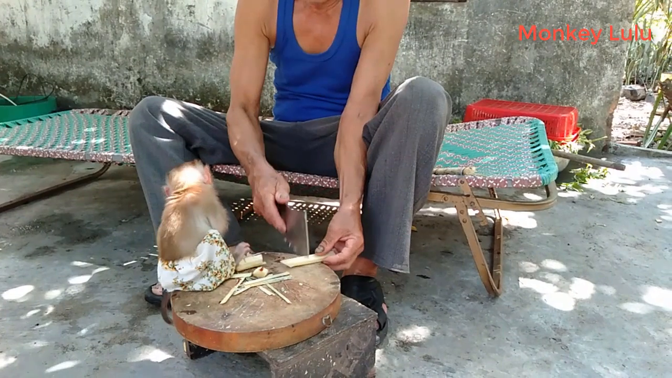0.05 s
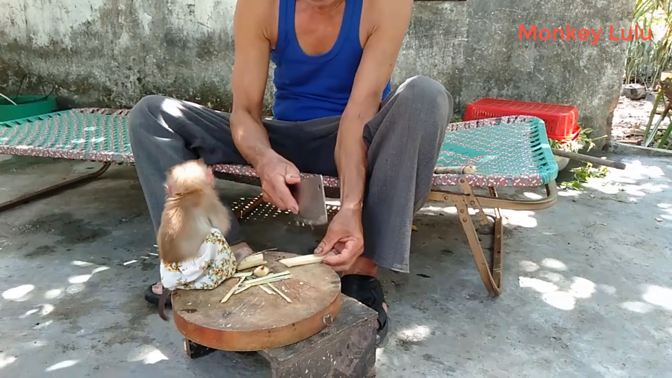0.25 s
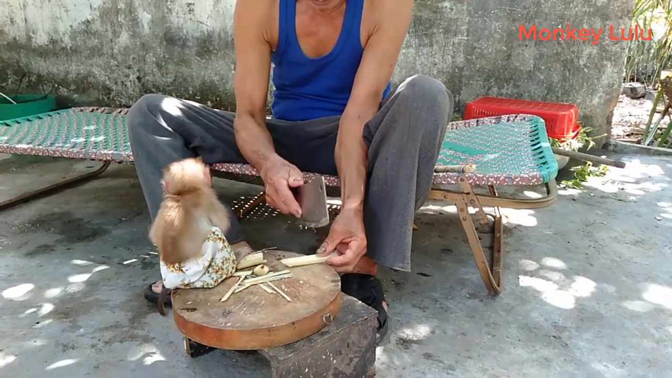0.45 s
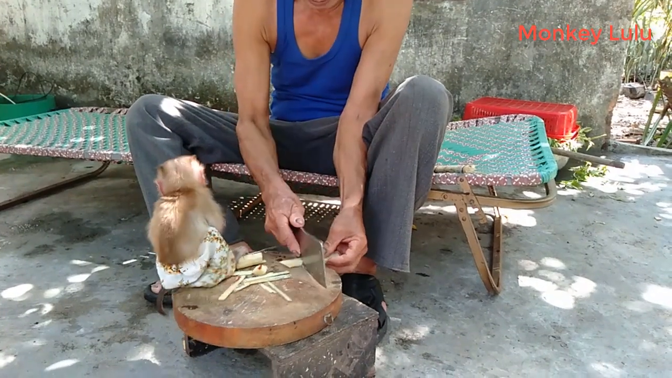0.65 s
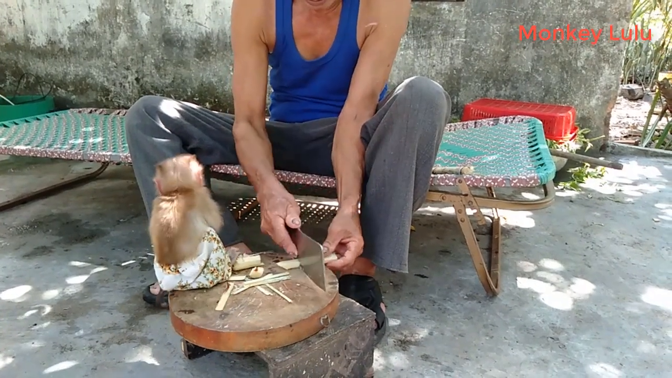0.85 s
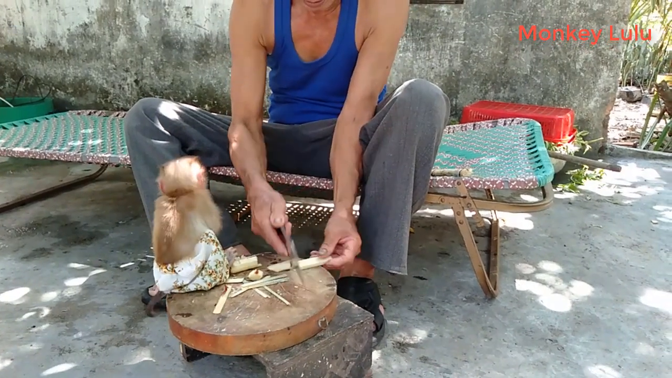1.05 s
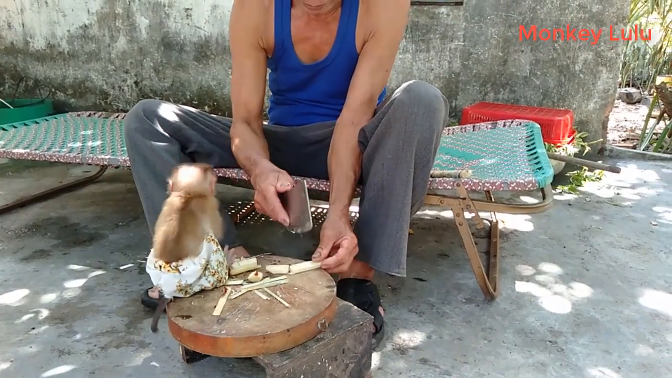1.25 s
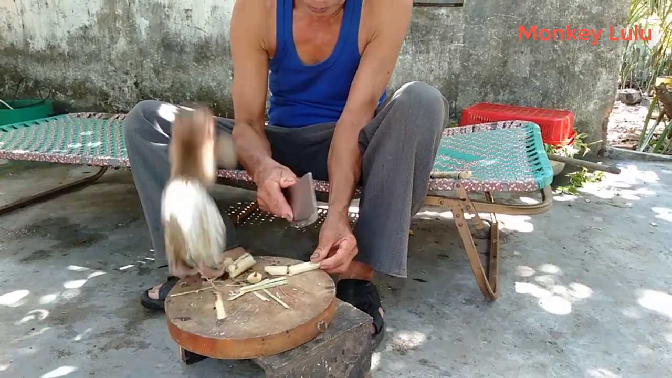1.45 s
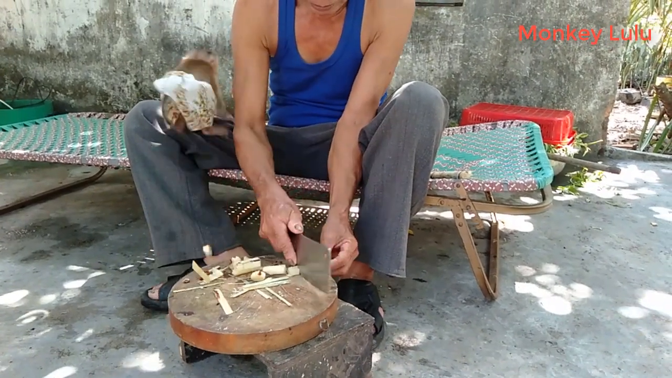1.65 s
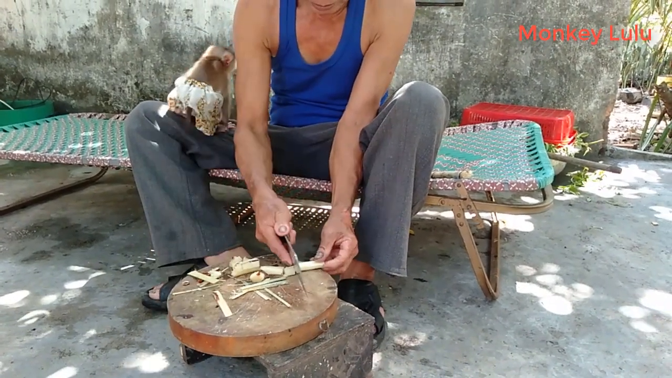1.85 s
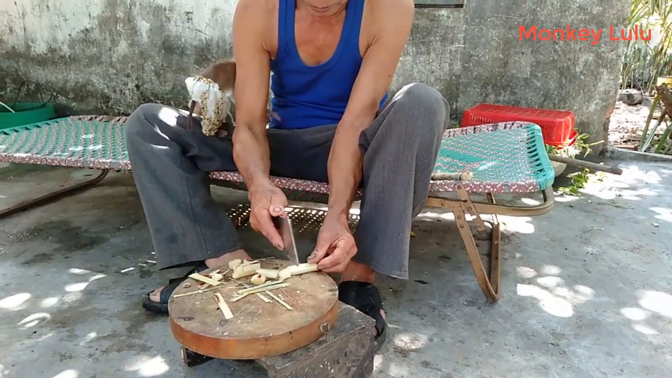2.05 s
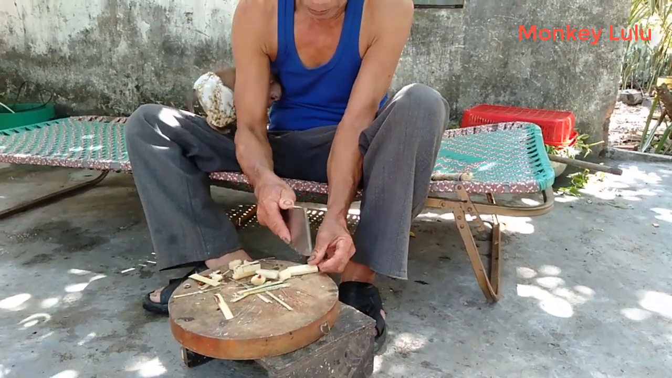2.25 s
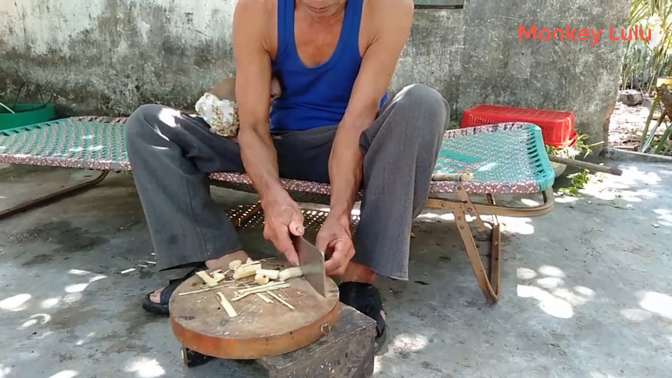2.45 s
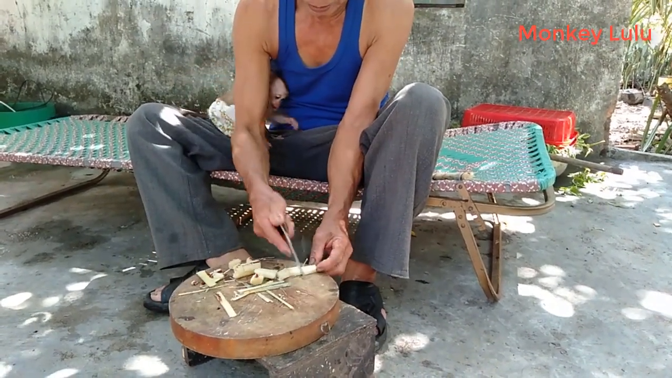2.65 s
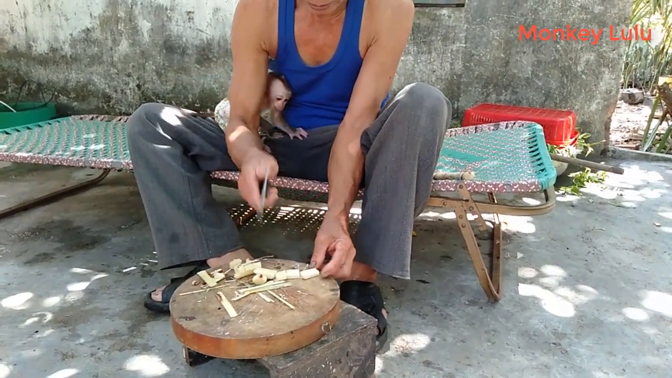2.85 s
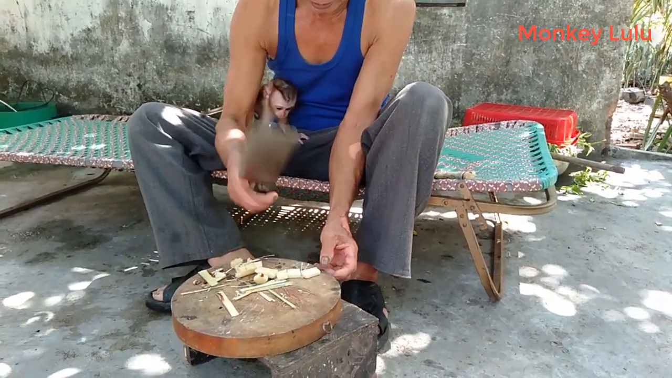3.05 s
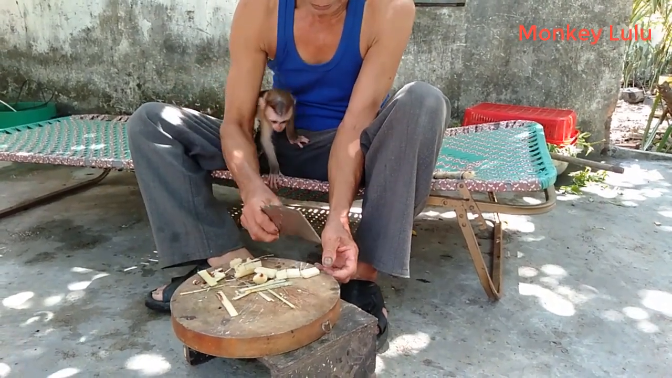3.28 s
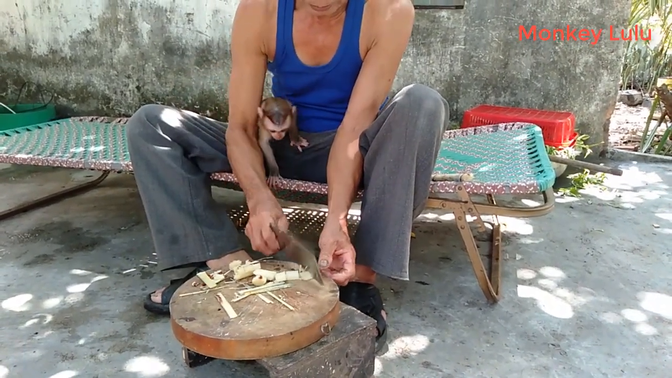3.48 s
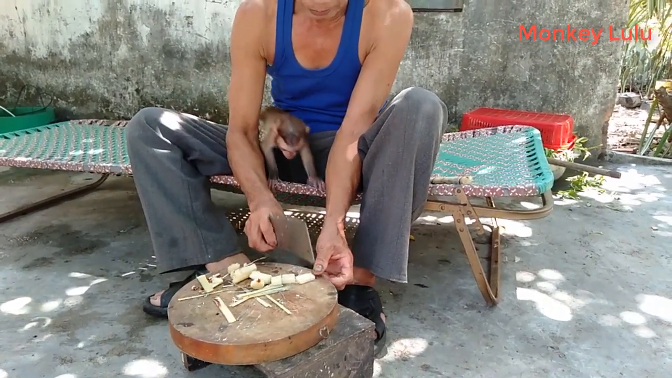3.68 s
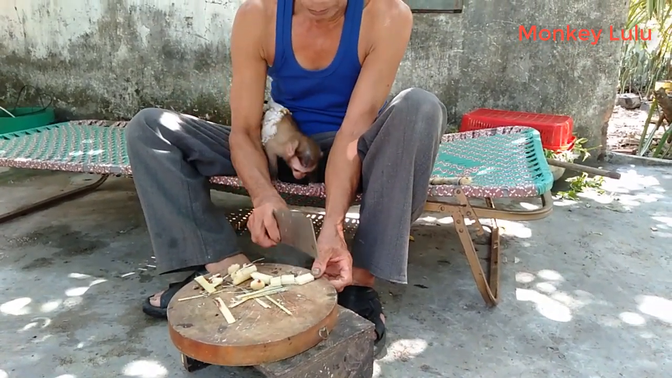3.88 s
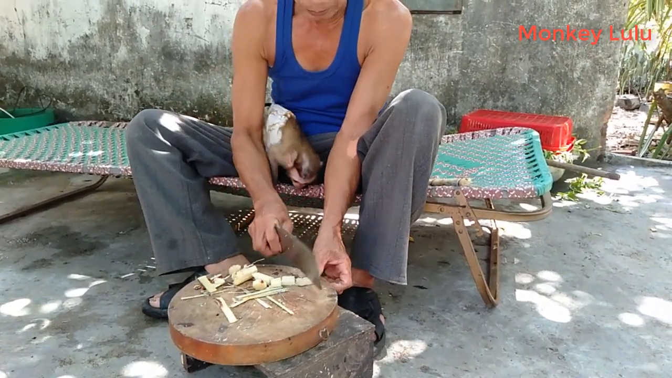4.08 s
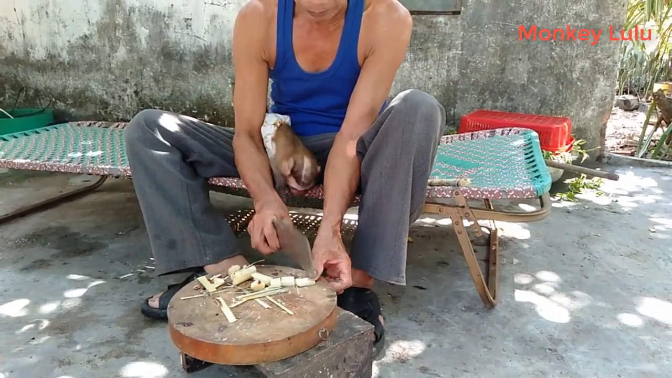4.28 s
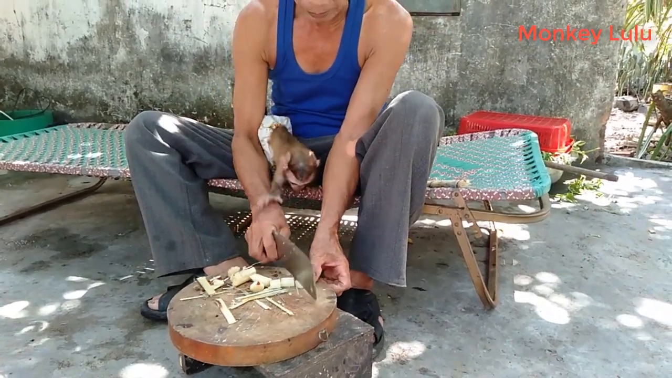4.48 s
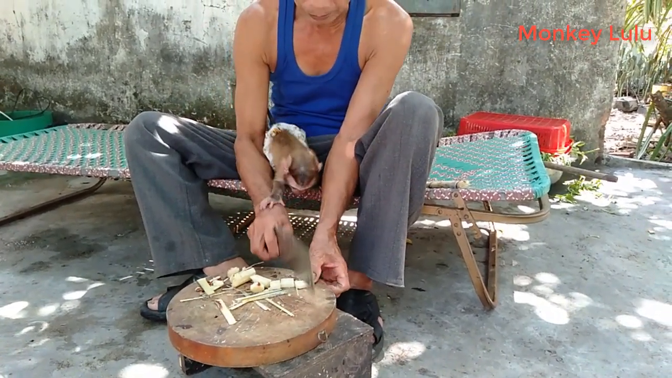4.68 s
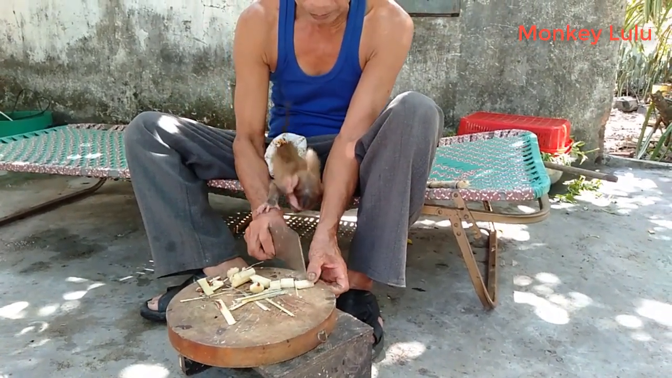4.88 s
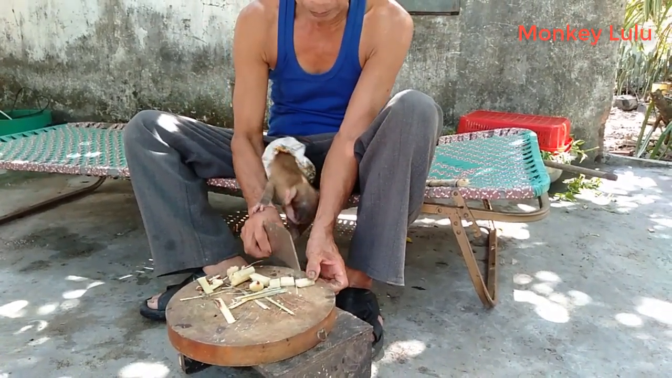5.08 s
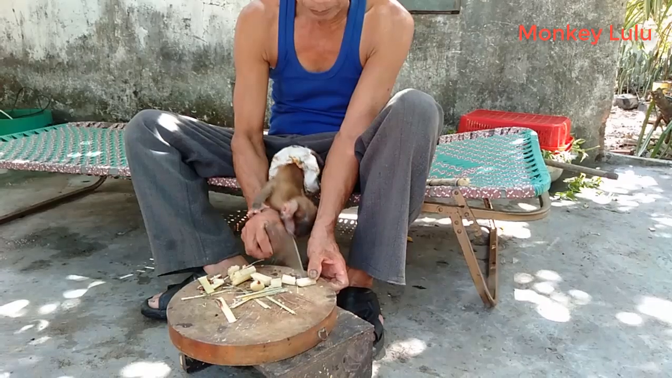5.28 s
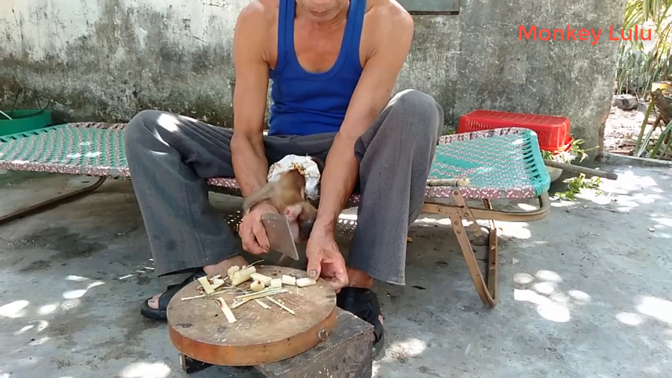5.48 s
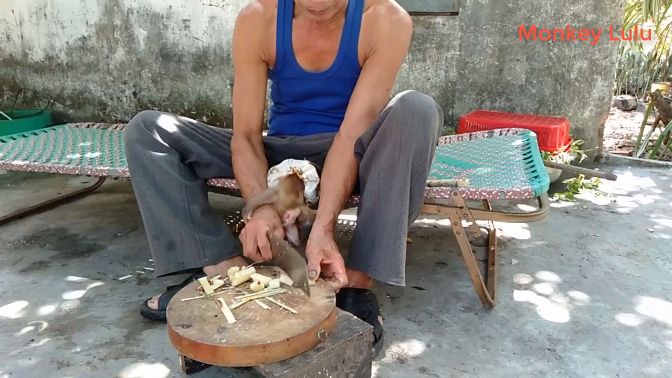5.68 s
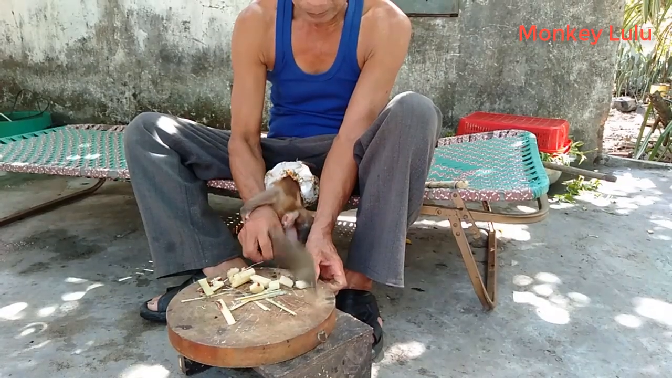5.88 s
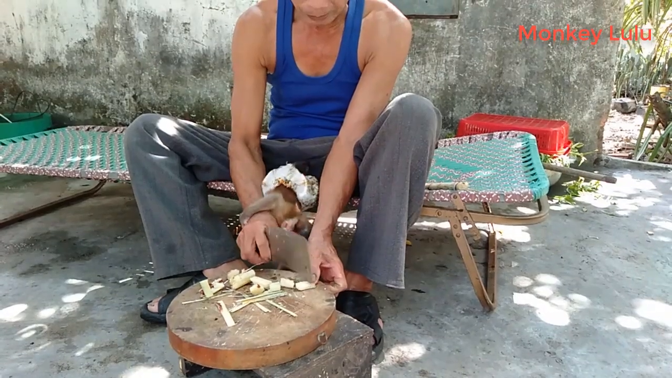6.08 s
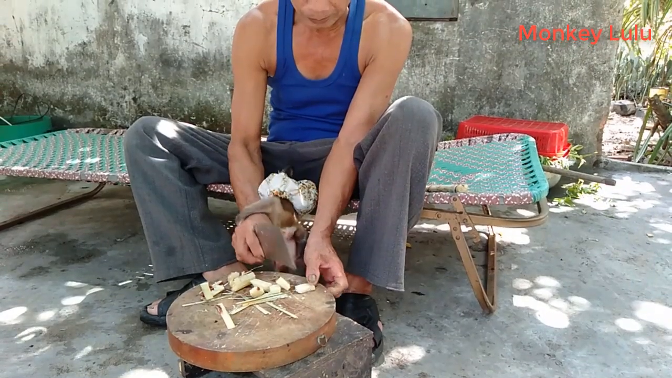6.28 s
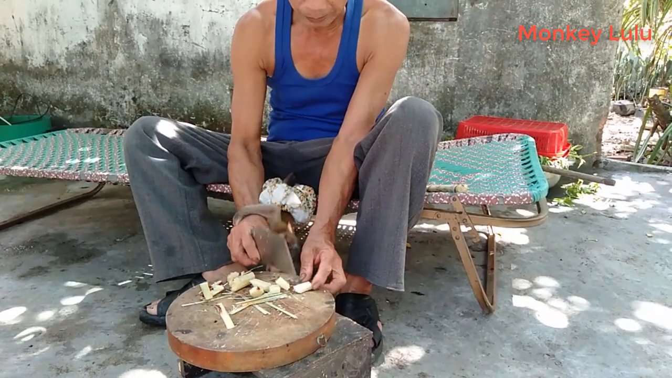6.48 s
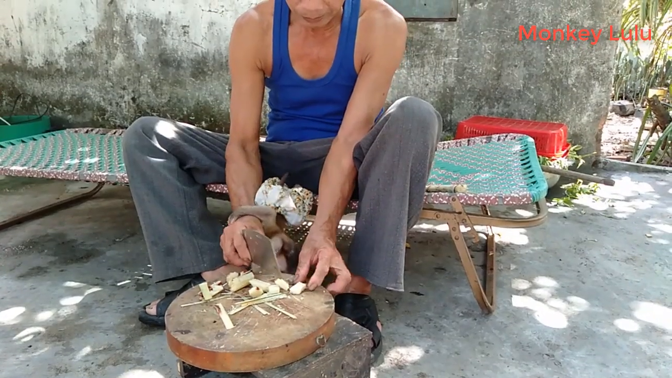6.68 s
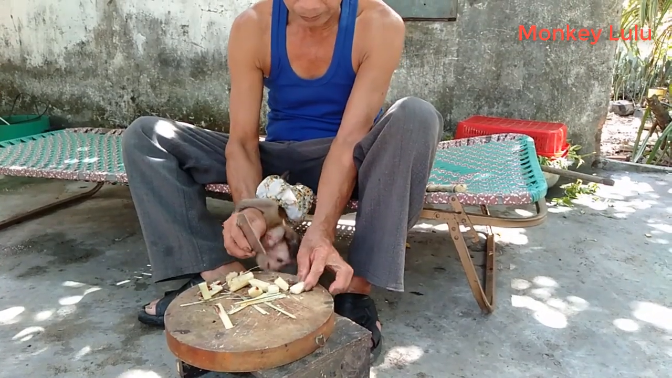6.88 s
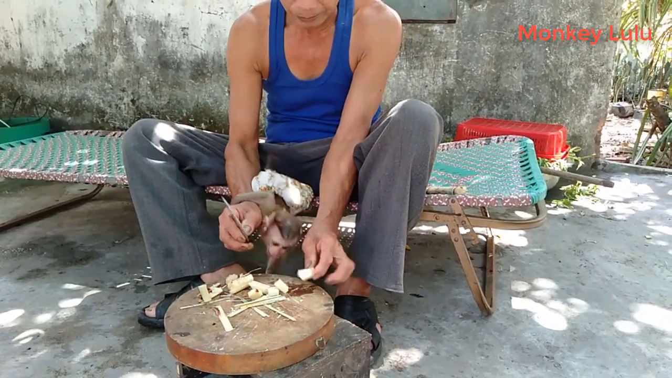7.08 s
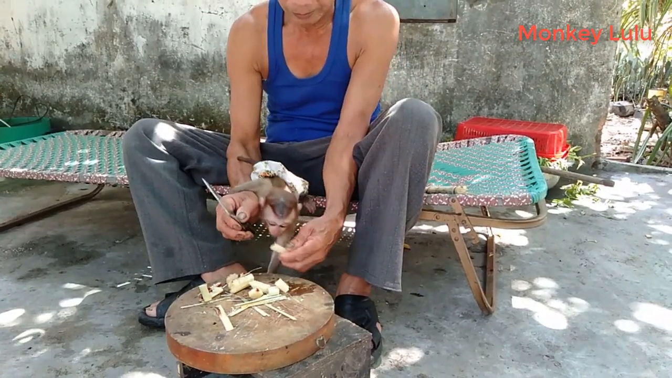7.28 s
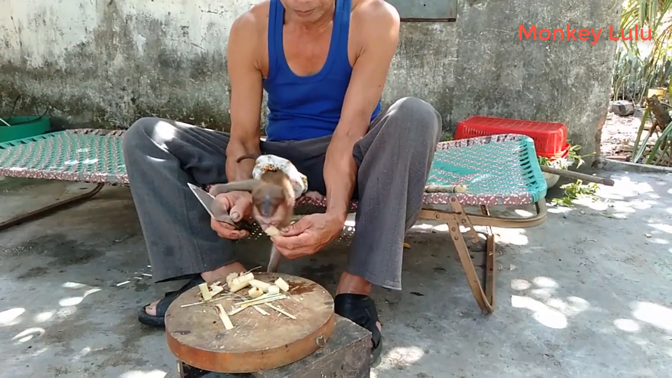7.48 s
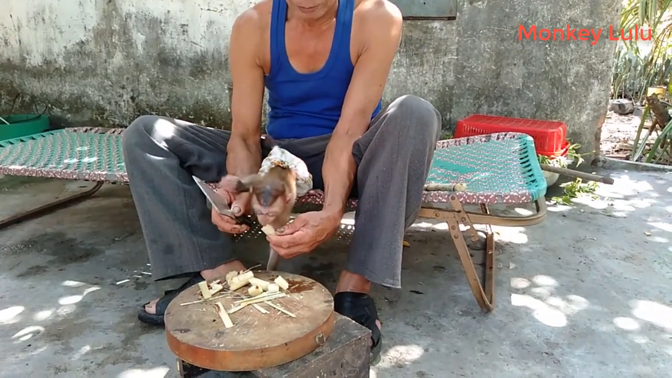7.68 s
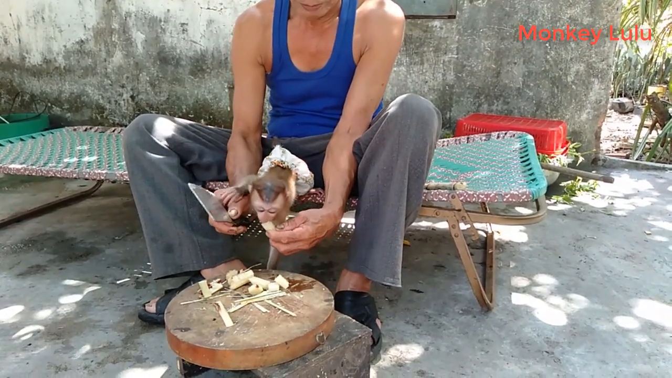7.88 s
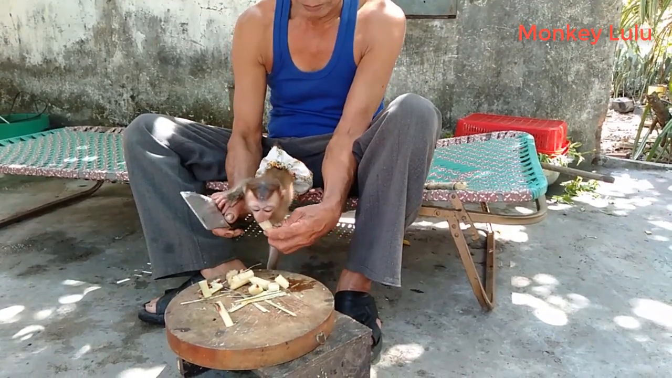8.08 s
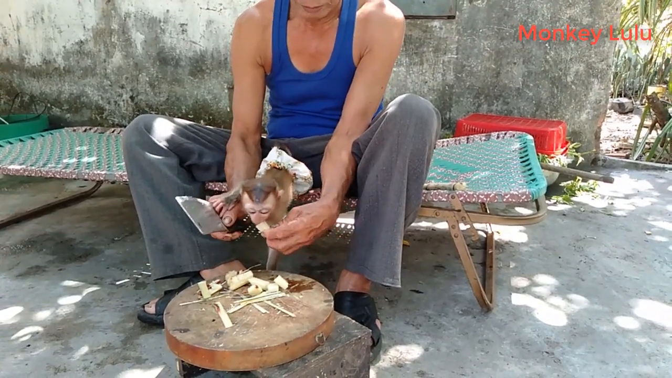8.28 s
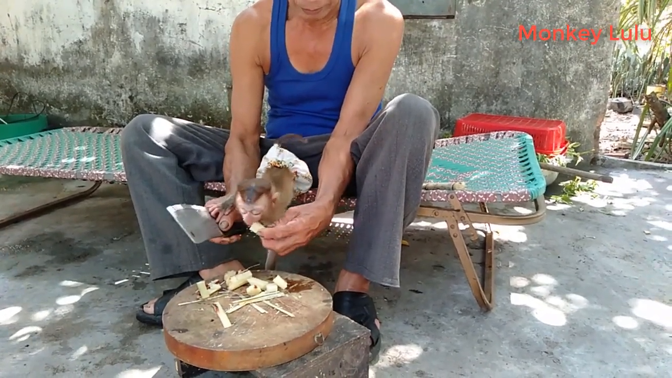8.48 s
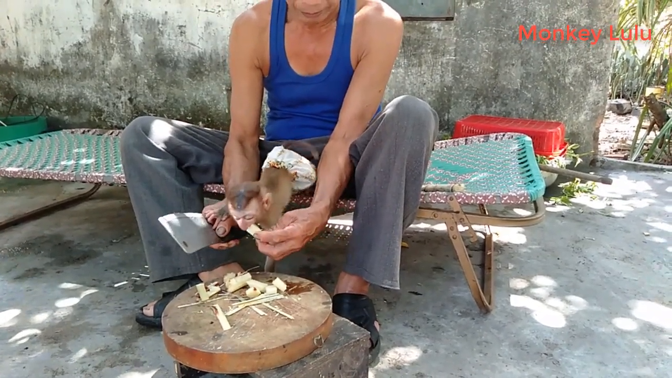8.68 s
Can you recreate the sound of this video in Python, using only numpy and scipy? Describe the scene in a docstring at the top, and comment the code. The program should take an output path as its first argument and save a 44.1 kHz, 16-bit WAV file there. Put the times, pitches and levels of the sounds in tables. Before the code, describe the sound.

A cleaver chops cane on a wooden block in irregular sharp knocks, with dry scuffing, small ticks and a steady high insect hiss outdoors.

```python
"""Insects hiss and a yard murmurs throughout, as shaped noise; something dry scuffs nearby for the first seconds.
Small ticks of cane pieces soon join: clicks through shared resonances, each with a short ring.
Then a cleaver chops cane on a round wooden block: noise crackles as fibres snap, damped modes knock, soft thuds follow.
Later a far bird chirps in husky sine glides. A decaying noise tail is the wall's answer to chops, ticks and bird."""
import sys
import numpy as np
from scipy import signal
from scipy.fft import rfft, irfft, next_fast_len
from scipy.io import wavfile
from scipy.ndimage import uniform_filter1d, map_coordinates

SR = 44100
rng = np.random.default_rng(int(sys.argv[2]) if len(sys.argv) > 2 else 0)


def unload_wav(signal):
    """Save mono or channel-first audio to the path in sys.argv[1] as 16-bit WAV at rate SR, clipped to [-1, 1]."""
    wavfile.write(
        sys.argv[1],
        SR,
        np.round(np.clip(np.atleast_2d(signal).T, -1, 1) * 32767).astype(np.int16),
    )


N = 385774


def amp(db):
    """Amplitude factor of a level in dB."""
    return 10 ** (np.asarray(db) / 20)


def unit(x):
    """x scaled to rms 1."""
    return x / np.sqrt(np.mean(x ** 2) + 1e-20)


def along(points, hz):
    """Interpolate (frequency [Hz], value) points on a log frequency axis."""
    f, v = np.transpose(points)
    return np.interp(np.log(hz + 1), np.log(f + 1), v)


def wobble(knots_per_s):
    """A smooth random curve through normally distributed knots."""
    knots = rng.standard_normal(int(N * knots_per_s / SR) + 4)
    return map_coordinates(knots, [np.arange(N) * knots_per_s / SR])


def filtered(x, response):
    """x times a response of frequency, zero-padded."""
    m = next_fast_len(len(x) + 8192)
    spectrum = rfft(x, m) * response(np.fft.rfftfreq(m, 1 / SR))
    return irfft(spectrum, m)[:len(x)]


def rush(spectrum, grain_db):
    """Shaped noise of rms 1 with a gritty fast flutter."""
    fluttering = rng.standard_normal(N) * amp(grain_db * wobble(400))
    return unit(filtered(fluttering, lambda f: amp(along(spectrum, f))))


def add(track, start_s, x):
    """Mix x into the track in place."""
    part = track[max(round(start_s * SR), 0):][:len(x)]
    part += x[:len(part)]


# merged insect band: (frequency [Hz], relative density [dB per Hz])
INSECT_SPECTRUM = [(2350, -49.5), (4000, -29.5), (4800, -23), (5570, -11.5), (6360, -7.5), (6470, -8),
                   (6890, 0), (7340, -2), (9330, -27.5), (11900, -28), (14600, -25.5), (15700, -27)]
# far traffic and air: (frequency [Hz], relative density [dB per Hz])
YARD_SPECTRUM = [(12, -43.5), (20, -6), (69, -2.5), (103, -10), (132, -12), (165, -13), (207, -18),
                 (380, -25.5), (582, -16), (1670, -25.5), (2190, -28), (2620, -25.5), (4300, -31.5),
                 (5590, -62), (9460, -120)]
YARD_DB, INSECT_DB = -73, -64.5


def background():
    """Many insects merge into a band of hiss; the yard murmurs below."""
    insect_db = INSECT_DB + 0.43 * wobble(1.6) + 0.58 * wobble(20)
    insects = amp(insect_db) * rush(INSECT_SPECTRUM, grain_db=-0.2)
    yard_db = YARD_DB + 0.2 * wobble(2.2)
    return insects + amp(yard_db) * rush(YARD_SPECTRUM, grain_db=-0.5)


# rubbing strokes: (start [s], attack [s], hold [s], release [s], first hollow pitch [Hz], last hollow pitch [Hz],
#                   rasp level [dB], middle level [dB], swish level [dB], drag level [dB])
STROKES = [(-.04, .04, .02, .11, 1829, 1870, -66, -65.5, -58, -80),
           (0.106, .11, 0.0604, .1, 1990, 1978, -51.5, -54.5, -51.5, -65),
           (0.216, .12, .21, .2, 1903, 1562, -53, -54.5, -43.5, -74.5),
           (.6, .06, .16, .08, 1560, 1570, -69, -68, -61.5, -77.5),
           (.8, 0.1075, .13, .1, 1780, 1832, -63.5, -63.5, -54.5, -79.5),
           (1.1, .09, 0.0609, .13, 1680, 1800, -58, -67, -60.5, -70.5),
           (1.307, 0.0404, .03, .1, 1836, 1861, -56.5, -69, -57.5, -88),
           (1.37, .1, 0.0698, .14, 1871, 1895, -62, -62, -54.5, -70.5),
           (1.5, .08, .1, .06, 1950, 1950, -71, -72, -62, -80.5),
           (1.58, .12, .14, .07, 1901, 1720, -63, -62.5, -56.5, -67.5),
           (1.88, .11, 0.0697, .2, 1760, 1821, -60.5, -63, -52, -72.5),
           (2.08, .08, .26, .12, 1848, 1800, -68, -71, -59.5, -79.5),
           (2.14, 0.037, .14, .05, 1840, 1800, -79, -81, -72, -67.5),
           (2.4, .08, .14, .08, 1774, 1500, -80, -77, -71, -74),
           (2.58, .05, .11, .08, 1400, 1570, -67, -78, -65, -69),
           (2.662, 0.098, .08, .07, 1831, 1950, -57, -63, -54.5, -72.5),
           (2.85, 0.0997, .25, .3, 1750, 1542, -78.5, -77, -66, -76),
           (3.33, 0.0782, 0.0595, .12, 1423, 1539, -71.5, -87, -84, -76.5)]
RAMP_DB = 26.5  # climb over one attack, fall over one release


def strokes():
    """Gains of the four rubbing layers, strokes summed in power; the stroke with the loudest rasp leads the pitch."""
    t = np.arange(N) / SR
    power, pull = np.full((4, N), 1e-14), np.zeros(N)
    for start_s, attack_s, hold_s, release_s, first_hz, last_hz, *layer_db in STROKES:
        corners_s = np.cumsum([start_s, attack_s, hold_s, release_s])
        before = (corners_s[1] - t) / attack_s
        after = (t - corners_s[2]) / release_s
        shape_db = -RAMP_DB * np.maximum(0, np.maximum(before, after))
        stroke_power = amp(shape_db + np.array(layer_db)[:, None]) ** 2
        power += stroke_power
        pull += stroke_power[0] * np.interp(t, corners_s[[1, 2]], [first_hz, last_hz])
    return np.sqrt(power), pull / power[0]


def patchy(x, depth_db):
    """The colour shifts: random gain in patches a few hundred Hz wide and some 50 ms long."""
    z = signal.stft(x, nperseg=512)[2]
    field = uniform_filter1d(rng.standard_normal(z.shape), size=5, axis=0)
    field = uniform_filter1d(field, size=9, axis=1)
    return unit(signal.istft(z * amp(depth_db * unit(field)), nperseg=512)[1][:N])


# rubbing layers, each: (frequency [Hz], relative density [dB per Hz]); the swish also colours the ticks' treble
RASP_SPECTRUM = [(600, -18), (1000, -9), (1500, -1), (2000, -3.5), (2600, -7.5), (3500, -34.5)]
MIDDLE_SPECTRUM = [(1800, -26.5), (2400, -2), (2800, 1.5), (3500, -4.5), (4700, -5), (5600, -13),
                   (7000, -29.5)]
SWISH_SPECTRUM = [(2940, -42), (5000, -14.5), (5800, -9.5), (7480, 1), (7920, -5), (8350, -9.5),
                  (9770, -14.5), (12500, -17), (15000, -8), (15700, -10)]
DRAG_SPECTRUM = [(200, -35), (350, -2), (700, -1.5), (1100, -1), (1600, -24.5)]


def scuff():
    """Dry rubbing: a rasp with a hollow resonance that slides, a hiss above it, a bright swish and a low drag."""
    (rasp_gain, middle_gain, swish_gain, drag_gain), pitch_hz = strokes()
    slow = filtered(rng.standard_normal(N) * amp(1.5 * wobble(150)), lambda f: 1 / (1 + (f / 165) ** 2))
    # narrow noise carried on the sliding pitch
    hollow = unit(slow * np.sin(2 * np.pi * np.cumsum(pitch_hz) / SR))
    rasp = unit(rush(RASP_SPECTRUM, grain_db=2.5) + amp(3) * hollow)
    middle = middle_gain * patchy(rush(MIDDLE_SPECTRUM, grain_db=1.0), depth_db=2)
    swish = swish_gain * patchy(rush(SWISH_SPECTRUM, grain_db=1.0), depth_db=2.5)
    drag = drag_gain * rush(DRAG_SPECTRUM, grain_db=4.5)

    def uneven(depth_db):
        return amp(depth_db * wobble(14))

    grit = amp(0.4 * wobble(45) + 0.89 * wobble(160))  # all bands stutter together as the surfaces catch
    return grit * (uneven(1.5) * rasp_gain * rasp + uneven(0.54) * (middle + swish) + uneven(1.9) * drag)


# decay of the answer: (frequency [Hz], t60 [s])
WALL_DECAY = [(100, 0.6), (500, 0.079), (1500, 0.23), (4000, 0.16), (10000, 0.1)]


def walls(x, wet_db):
    """The sound plus its own diffuse answer from floor and wall, each frequency dying at its own speed."""
    hz, t, z = signal.stft(rng.standard_normal(SR // 3), SR, nperseg=256)
    decay = amp(-60 * t / along(WALL_DECAY, hz)[:, None])
    tail = signal.istft(z * decay, SR, nperseg=256)[1]
    delayed = np.pad(x, (round(0.0025 * SR), 0))
    wet = amp(wet_db) * signal.fftconvolve(delayed, tail / np.linalg.norm(tail))
    wet[:len(x)] += x
    return wet


def crackle(length_s, db, t60_s, colour, swell_db=0):
    """Fibres snap for a length of time, swelling to their level, then the snaps die away."""
    t = np.arange(SR // 10) / SR
    fall_db = -60 * np.clip(t - length_s, 0, 1) / t60_s
    rise_db = -swell_db * np.clip(1 - t / length_s, 0, 1)
    gate = np.clip(t / 0.00053, 0, 1) * amp(fall_db + rise_db)
    # the level jumps every 21 samples
    jumps = np.repeat(rng.standard_normal(len(t) // 21), 21)
    snaps = rng.standard_normal(len(t)) * amp(3.5 * jumps)
    return amp(db) * gate * unit(filtered(snaps, colour))


# resonances shared by the cane pieces: (frequency [Hz], half-width [Hz], relative level [dB])
PIECE_RESONANCES = [(1590, 670, -8), (2780, 580, -6.5), (4750, 210, -15)]
# small dry ticks: (time [s], base level before layer offsets [dB], pitch [Hz], treble relative to base [dB])
TICKS = [(0.6648, -52.5, 1480, 13), (0.6812, -53, 1480, 22.5), (0.7072, -50, 2130, 8),
         (0.8276, -51, 1560, 4.5), (1.1521, -48, 1680, 1), (1.2186, -52, 1710, -13),
         (1.346, -56.5, 1857, -4.5), (1.9415, -58, 1750, 8), (2.1052, -47.5, 1770, 4),
         (2.371, -65, 1880, -14), (2.3945, -62, 1763, -9), (2.4161, -43.5, 1890, -5),
         (2.4287, -46, 1850, 4), (3.1122, -58.5, 4700, -1.5), (3.1658, -60, 1430, -4),
         (3.1925, -56, 1470, -10), (5.0351, -47.5, 2160, 10), (5.4126, -44, 1720, -16),
         (5.4606, -39, 1393, -26), (5.6184, -39.5, 1646, -21.5), (6.2176, -49, 1746, -9),
         (7.2352, -58, 2720, -3.5), (7.2728, -60, 1640, -2)]


def ticks():
    """A cane piece snaps: a click through the resonances that all pieces share, and a short ring at its own pitch."""
    out, t = np.zeros(N), np.arange(SR // 10) / SR

    def shared(f):
        floor = amp(-17) * (f > 900) * (f < 5200)
        return floor + sum(amp(db) / (1 + ((f - c) / w) ** 2) for c, w, db in PIECE_RESONANCES)

    for time_s, db, hz, treble_db in TICKS:
        pitched = amp(db - 6.0 - 60 * t / 0.028) * np.sin(2 * np.pi * hz * t) * (1 - np.exp(-t / .0006))
        click = crackle(0.0029, db - 11, .015, shared)
        add(out, time_s, walls(click + pitched, wet_db=-10.5))
        treble = crackle(.0015, db + treble_db - 7, .015, lambda f: amp(along(SWISH_SPECTRUM, f)))
        add(out, time_s, treble)
    return out


def ring(modes, spread_db, middle_db=0, edge_db=0):
    """Damped modes at new strengths, peak 1; where the blow lands sets the middle and upper ones."""
    t = np.arange(SR // 4) / SR
    x = np.zeros(len(t))
    for hz, db, t60_s in modes:
        zone_db = edge_db * (hz > 1280) + middle_db * (650 < hz <= 1280)
        level_db = db + rng.normal(0, spread_db) + zone_db
        x += amp(level_db - 60 * t / t60_s) * np.sin(2 * np.pi * hz * rng.normal(1, 0.018) * t)
    x = -x * (1 - np.exp(-t / 0.00067))
    return x / np.abs(x).max()


# modes of the block, then of the stump under it: (nominal frequency [Hz], relative level [dB], t60 [s])
BLOCK_MODES = [(452.3, 0.5, 0.065), (572.6, -8.5, 0.023), (840, -6, 0.075), (914.6, 3, .06),
               (957, 0.5, 0.046), (1170, -9.5, 0.04), (1435, -4, 0.051), (1619, -8.5, 0.069),
               (2030, -5, 0.038), (2595, -8.5, 0.01), (3320, -16.5, 0.037)]
STAND_MODES = [(70, -19, .09), (120, -5, .09), (165, -1, .07), (215, 0, .07), (290, -5, .05)]
# dense upper modes of the wood: (frequency [Hz], relative density [dB per Hz])
GRAIN_SPECTRUM = [(200, -39), (330, -12.5), (430, -1.5), (620, -9.5), (920, -5), (1500, -3.5), (2200, -8),
                  (3300, -18), (5300, -24.5), (7000, -28.5), (9500, -50.5)]


def knock(db, thump_db, middle_db, edge_db, bite_db, free_s, wet_db):
    """The block rings freely for a moment until the blade's weight damps it; it also pushes its stand."""
    wood = ring(BLOCK_MODES, 1.5, middle_db, edge_db + 6)
    t = np.arange(len(wood)) / SR
    wood = wood * np.maximum(amp(-60 * np.clip(t - free_s, 0, 1) / 0.025), amp(-16.5))

    def dense_response(f):
        edge = 0.89 * edge_db * (f > 1280)
        middle = 0.65 * middle_db * (f > 650) * (f <= 1280)
        return amp(along(GRAIN_SPECTRUM, f) + edge + middle + bite_db * (f > 2300))

    dense = unit(filtered(rng.standard_normal(len(t)), dense_response))
    two_stage_decay = amp(-13.5 - 60 * t / 0.051) + amp(-24 - 60 * t / 0.21)
    wood = wood + dense * two_stage_decay * (1 - np.exp(-t / 0.0019))
    stand = amp(thump_db) * ring(STAND_MODES, 3.7)
    return amp(db) * walls(wood + stand, wet_db)


# snapping fibres: (frequency [Hz], relative density [dB per Hz])
SNAP_SPECTRUM = [(300, -24.5), (900, 1.5), (2500, -8.5), (4500, -12.5), (6200, 1.5), (7400, 3.5),
                 (9800, -15.5), (12500, -16), (15000, -5), (15700, -9)]
# cleaver blows: (blade meets wood [s], knock level [dB], thump relative to knock [dB],
#                 middle setting [dB], edge setting [dB], both weighted in knock(),
#                 bite of the dense modes [dB], cut through cane [s], crackle level [dB])
BLOWS = [(0.7403, -18, -32.5, 0.5, -13.5, -4.5, .008, -37), (1.6975, -17, -26, 2, -3, -3.5, .009, -35.5),
         (2.4509, -18.5, -70, -1, -12.5, 5, .0105, -39.5), (3.5964, -29.5, -9, -3, -9.5, 0, .0016, -48),
         (3.847, -27.5, -10, -6.5, -13, 3, .0012, -48.5), (4.0995, -26.5, -11, -4, -9, 8, .003, -41),
         (4.5765, -15, -30, -4.5, -6.5, 1, .0022, -47.5), (4.812, -15.5, -35, -4, -5, 1.5, .003, -54.5),
         (5.274, -23.5, -23, -8, -15.5, 1.5, .003, -53),
         (6.0031, -17.5, -23.5, -3.5, -7.5, 0.5, .0032, -51)]
# soft contacts with the block: (time [s], knock level [dB], thump relative to knock [dB],
#                               middle setting [dB], edge setting [dB], both weighted in knock())
THUDS = [(2.182, -62, -24, -27, -8.5), (2.255, -61, -16, 2, 8), (2.296, -61.5, -15, -14, -24),
         (3.051, -57, -33, 3, 0), (4.257, -47.5, -10, 2, -12), (5.034, -51, -8, -16, -35),
         (5.054, -49.5, -2.5, -10.5, -36), (5.145, -51.5, -0.5, -6, -28), (5.738, -45, 4, 0, -2),
         (5.754, -48.5, -7.5, -7.5, -17.5), (5.769, -48, -20, -16.5, -39.5), (6.241, -52, -1.5, -6, -9.5),
         (6.254, -41.5, -2.5, -7.5, -20), (6.272, -50, -18, -13, -36)]
CRACKLE_ON_S = 0.00059  # the fibres crackle on this long after the blade has met the wood
FREE_S, CANE_DAMPS = 0.0063, 0.18  # free ringing [s]; a cut through cane shortens it by this share of the cut


def cleaver():
    """The blade crackles through the cane until it meets the wood; soft thuds strike the same block."""
    out = np.zeros(N)
    for time_s, db, thump_db, middle_db, edge_db, bite_db, cut_s, crackle_db in BLOWS:
        fibres = crackle(cut_s + CRACKLE_ON_S, crackle_db, 0.017,
                         lambda f: amp(along(SNAP_SPECTRUM, f)), swell_db=4)
        add(out, time_s - cut_s, walls(fibres, wet_db=-13.5))
        free_s = FREE_S - CANE_DAMPS * cut_s
        add(out, time_s, knock(db, thump_db, middle_db, edge_db, bite_db, free_s, wet_db=-13.0))
    for time_s, db, thump_db, middle_db, edge_db in THUDS:
        add(out, time_s, knock(db, thump_db, middle_db, edge_db, 0, free_s=.008, wet_db=-9.5))
    return filtered(out, lambda f: (1j * f / (45 + 1j * f)) ** 2)  # a small block sends out no deep bass


# far bird: (time [s], length [s], first pitch [Hz], last pitch [Hz], level before husk and walls [dB])
CHIRPS = [(3.74, .08, 2550, 2670, -85), (3.907, 0.085, 2700, 2710, -86), (4.27, 0.06, 2480, 2470, -86),
          (4.458, .1, 2850, 2630, -91), (5.525, 0.081, 2720, 3100, -83), (6.58, 0.082, 2487, 2500, -89),
          (6.849, 0.1, 3220, 2690, -88), (6.962, 0.068, 2554, 2800, -83.5), (7.178, 0.12, 3170, 2615, -85),
          (7.36, 0.08, 3290, 3310, -90), (7.527, 0.1, 2450, 2470, -88.5), (7.631, 0.073, 2700, 2910, -91.5),
          (7.79, .06, 2620, 2550, -89.5), (7.871, 0.074, 3060, 2530, -85.5), (8.13, .1, 2450, 2550, -90.5),
          (8.137, .08, 3670, 3740, -89), (8.447, 0.07, 2490, 2450, -90.5), (8.51, 0.049, 3520, 3440, -88.5)]


def bird():
    """Short husky glides with an uneven warble, blurred by distance."""
    out = np.zeros(N)
    for time_s, length_s, first_hz, last_hz, db in CHIRPS:
        n = round(length_s * SR)
        husk = map_coordinates(rng.standard_normal(60), [np.arange(n) * 250 / SR])
        warble = 1 + .045 * map_coordinates(rng.standard_normal(40), [np.arange(n) * 90 / SR])
        pitch_hz = warble * np.linspace(first_hz, last_hz, n)
        envelope = amp(db + 4 * husk) * np.sqrt(np.hanning(n))
        glide = envelope * np.sin(2 * np.pi * np.cumsum(pitch_hz) / SR)
        add(out, time_s, walls(glide, wet_db=7))
    return out


def scene():
    """All sources summed, one channel."""
    return (background() + scuff() + ticks() + cleaver() + bird())[None]


TOP_HZ = 15700


def record(dry):
    """The microphone rolls off the deepest bass and keeps nothing above its band limit."""
    return filtered(dry[0], lambda hz: (hz < TOP_HZ) * (1j * hz / (30 + 1j * hz)) ** 2)[None]


dry = scene()
out = record(dry)
unload_wav(out)
```